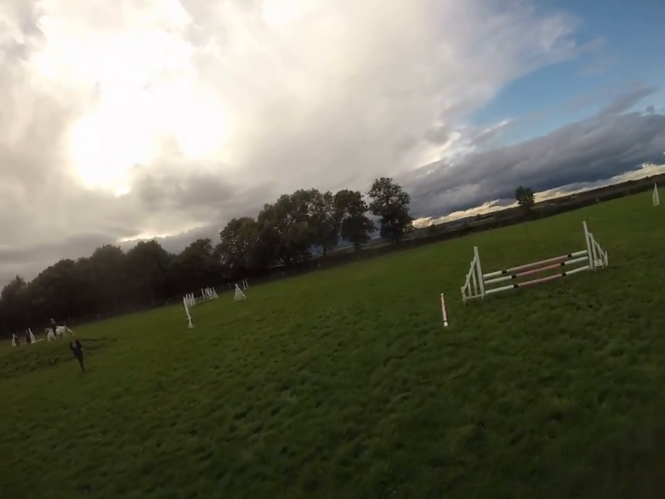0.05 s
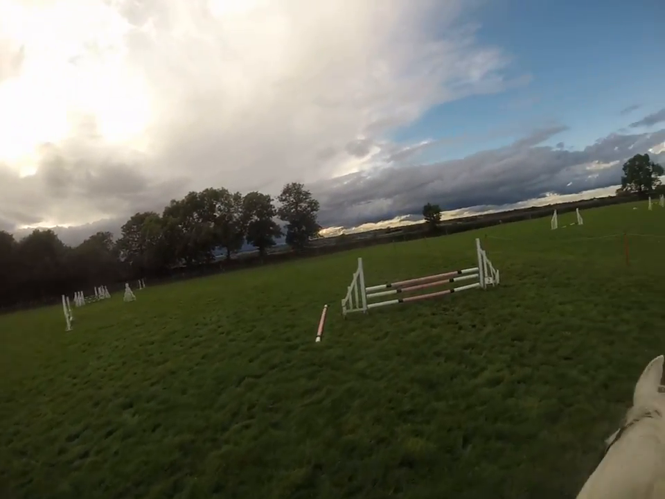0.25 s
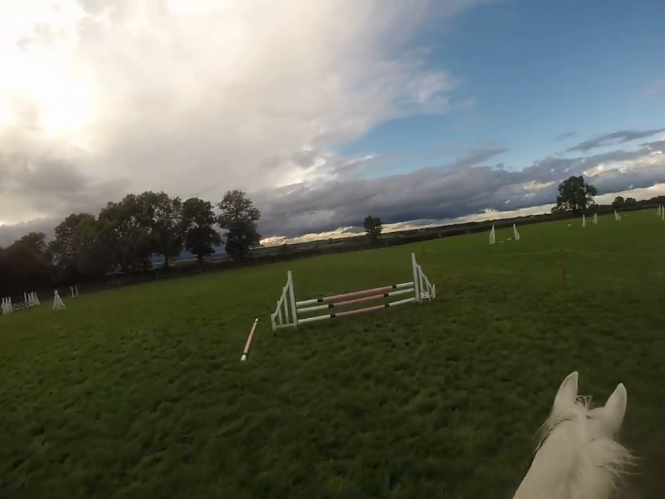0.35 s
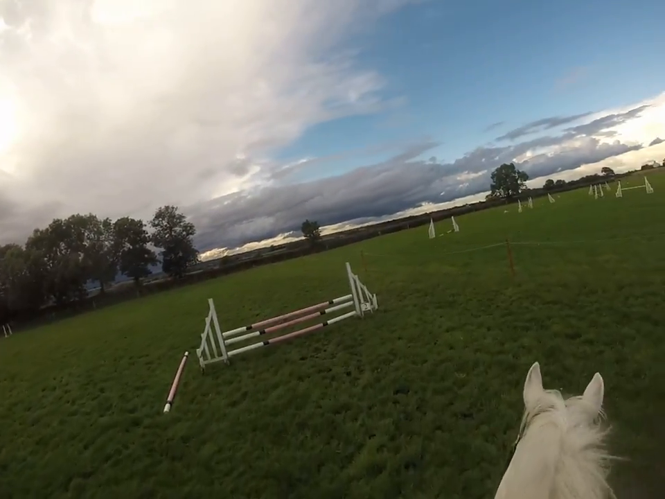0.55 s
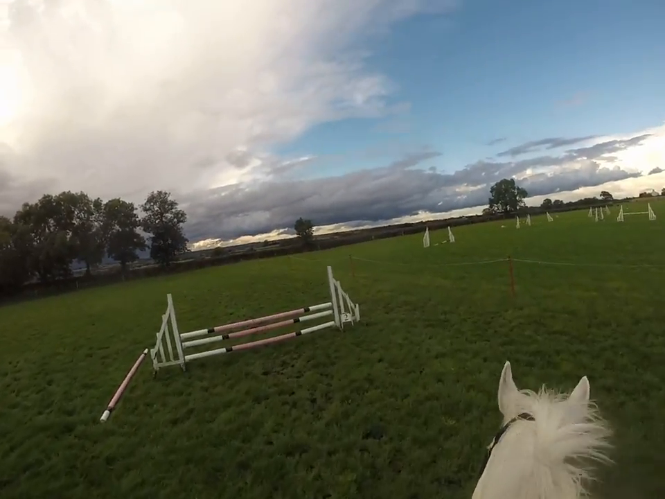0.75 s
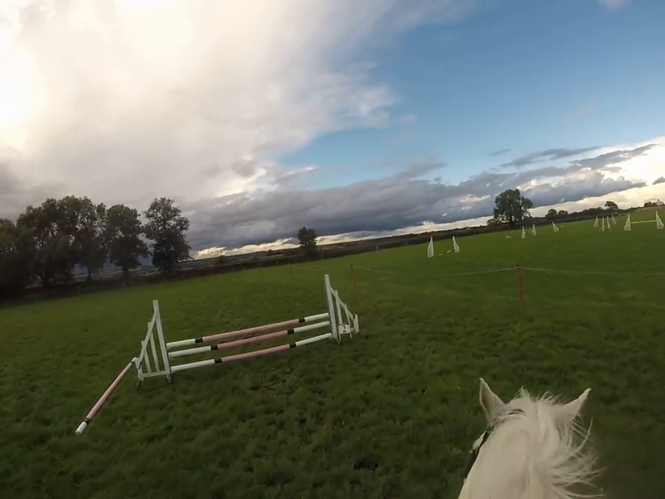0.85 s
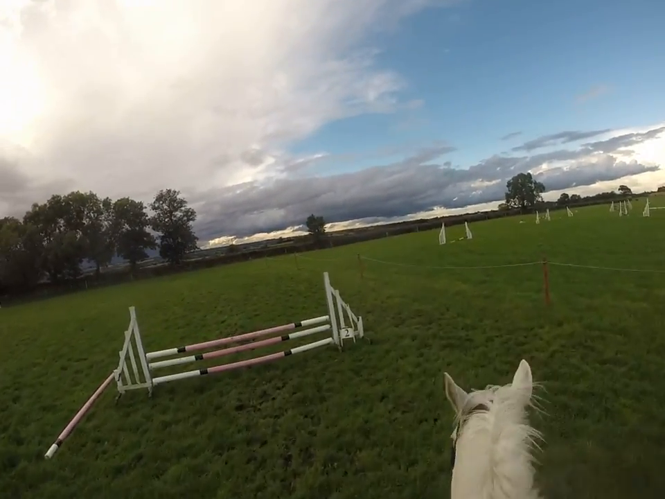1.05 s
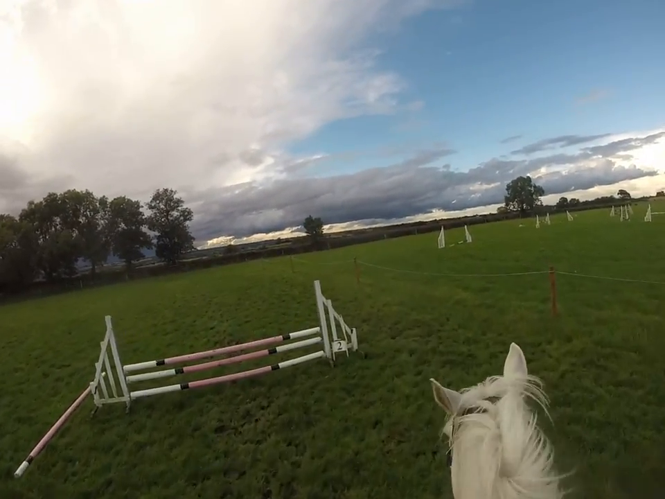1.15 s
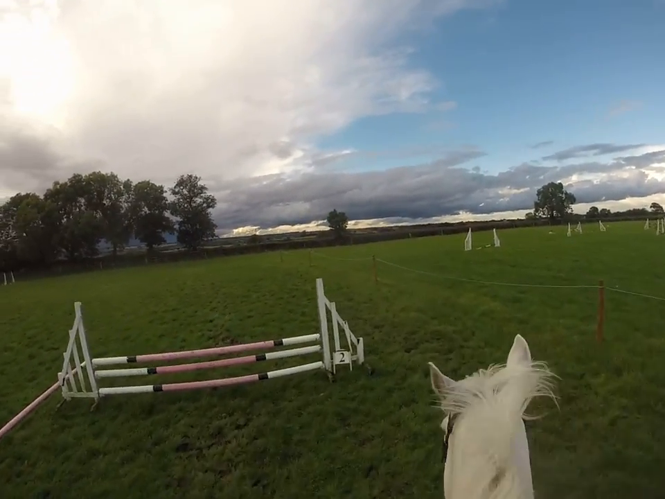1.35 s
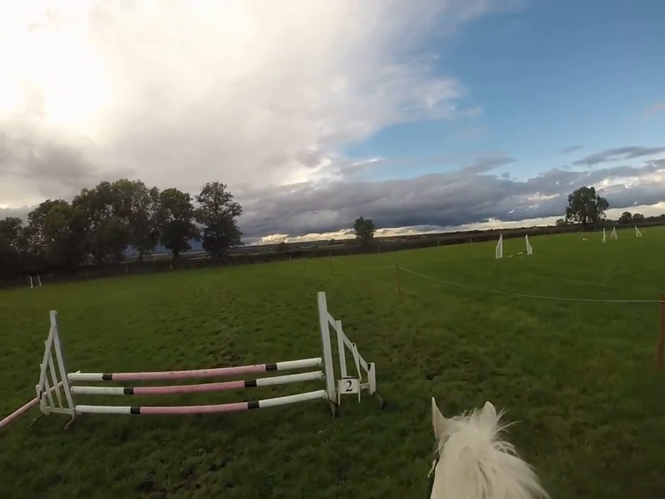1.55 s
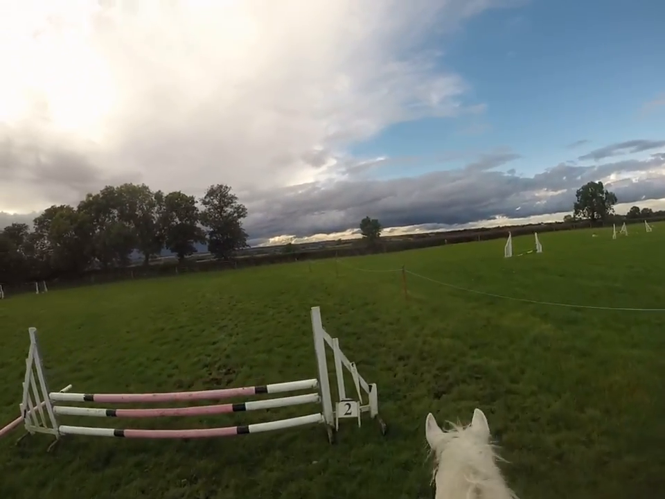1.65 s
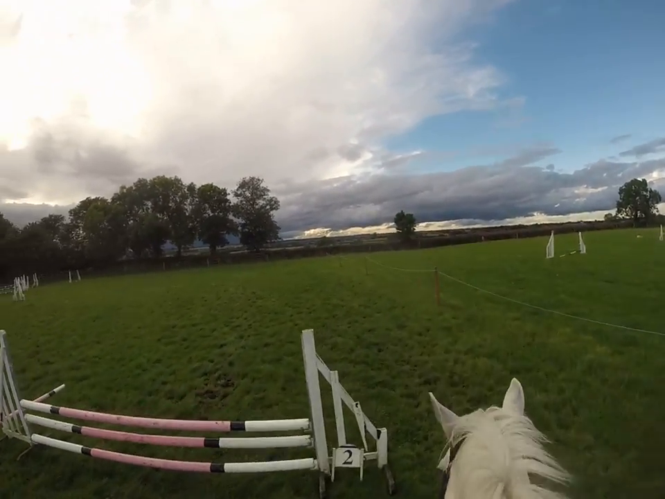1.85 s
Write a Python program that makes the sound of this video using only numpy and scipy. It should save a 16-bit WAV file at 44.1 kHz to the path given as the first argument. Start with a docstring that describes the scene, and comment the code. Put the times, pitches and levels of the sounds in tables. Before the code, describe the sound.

Wind buffets a microphone worn by a rider crossing an open field, rising and falling in quick waves over a faint hiss. The cantering horse's hooves shake the microphone with deep, muffled bumps, the first group the strongest.

```python
"""Wind on a cantering rider's camera

A horse canters over a grass field. The air rush swells with every stride, eddies buffet
the microphone, an edge whistles faintly, and a thin hiss stays steady. Hoofbeats shake
the worn camera with low, soft bumps, and its mount rubs faintly now and then."""
import sys
import numpy as np
from scipy import signal
from scipy.fft import rfft, irfft
from scipy.io import wavfile
from scipy.ndimage import uniform_filter1d

SR = 44100
rng = np.random.default_rng(int(sys.argv[2]) if len(sys.argv) > 2 else 0)


def unload_audio(sound):
    """Save the sound as a 16-bit wav file, at the path given as the first command line argument."""
    columns = np.transpose(np.atleast_2d(sound))
    # keep every value between -1 and 1, then stretch to whole-number steps
    steps = np.round(np.clip(columns, -1, 1) * 32767)
    wavfile.write(sys.argv[1], SR, steps.astype(np.int16))


N = 83790


def undb(db):
    """Decibels to gain."""
    return 10 ** (np.asarray(db) / 20)


def curve(t, points):
    """Straight lines through (time_s, value) points."""
    return np.interp(t, *np.array(points, float).T)


def noise(spectrum):
    """Unit-rms noise shaped by (freq_hz, density_db) points."""
    hz, db = np.array(spectrum, float).T
    bins_hz = np.maximum(np.arange(N // 2 + 1) * SR / N, 1)
    gain = undb(np.interp(np.log(bins_hz), np.log(hz), db))
    bass_rolloff = np.minimum(bins_hz / hz[0], 1) ** 2
    y = irfft(rfft(rng.standard_normal(N)) * gain * bass_rolloff, N)
    return y / np.std(y)


def wander(rate_hz):
    """Smooth random drift, zero mean, unit rms."""
    hold = max(int(SR / rate_hz), 2)
    steps = np.repeat(rng.standard_normal(N // hold + 1), hold)
    y = uniform_filter1d(uniform_filter1d(steps, hold), hold)[:N]
    return (y - y.mean()) / np.std(y)


# Hiss spectrum: freq_hz, density_db
HISS_SPECTRUM = [(100, 9.5), (330, 4.5), (570, 2.5), (760, 0.5), (1200, -2.5), (1550, -1), (2020, -3.5),
                 (2260, 2.5), (2450, -3), (2650, -6), (3000, -9), (4400, -11), (7000, -18.5),
                 (10000, -22.5), (15000, -32.5)]


def hiss():
    """Thin, steady hiss with a slight flutter."""
    level_db, flutter_db = -56, 0.56
    return noise(HISS_SPECTRUM) * undb(level_db + flutter_db * wander(21.37))


# Bright rush over the housing and low roar, swelling per stride: time_s, level_db
RUSH_LEVEL = [(0, -54.5), (0.125, -51.5), (0.19, -50.5), (0.27, -51.5), (0.32, -52.5), (0.39, -57.5),
              (0.58, -66), (0.7, -59.5), (0.76, -53.8), (0.815, -59.5), (0.875, -55), (0.98, -59),
              (1.07, -74), (1.3, -56.5), (1.45, -54), (1.52, -60), (1.67, -74), (1.82, -58), (1.89, -54)]
ROAR_LEVEL = [(0, -55), (0.15, -50), (0.28, -55.5), (0.38, -51), (0.54, -61), (0.63, -54), (0.78, -51),
              (0.91, -46.5), (1.09, -61), (1.2, -51), (1.3, -52), (1.38, -46), (1.52, -51.5), (1.71, -62),
              (1.8, -50.5), (1.9, -51.5)]
# Airflow spectra: freq_hz, density_db
RUSH_SPECTRUM = [(150, -20), (350, -4.5), (580, 3), (720, -6), (980, 1), (1250, -3.5), (1500, 4.5),
                 (1680, 1.5), (1870, 5.5), (2250, 2), (2640, 0.5), (2950, -9), (4200, -16), (6500, -23.5),
                 (15000, -59)]
ROAR_SPECTRUM = [(45, 13.5), (85, -2), (135, 7.5), (215, 5.5), (310, -4.5), (450, -12), (580, -6),
                 (800, -14.5), (2000, -62)]
EDDY_SPECTRUM = [(10, 7.5), (25, -1), (42, 1), (62, -6), (82, -14.5), (112, -8.5), (160, -16), (215, -17.5),
                 (300, -28), (500, -34), (1200, -66)]


def wind(t):
    """Each stride surges forward, swelling the rush, the roar and the eddies at the microphone."""
    flutter_db, eddy_flutter_db = 1, 1.44
    eddy_db, eddy_db_per_roar_db = -41.5, 0.4
    flutter = undb(flutter_db * wander(60.36))
    rush = noise(RUSH_SPECTRUM) * undb(curve(t, RUSH_LEVEL))
    roar_db = curve(t, ROAR_LEVEL)
    roar = noise(ROAR_SPECTRUM) * undb(roar_db)
    swell_db = eddy_db_per_roar_db * (roar_db - roar_db.mean())
    eddies = noise(EDDY_SPECTRUM) * undb(eddy_db + swell_db + eddy_flutter_db * wander(34.94))
    return flutter * (rush + roar) + eddies


# Edge tones: centre_s, level_db, pitch_hz, half_width_s
WHISTLES = [(0.32, -50.5, 2225, 0.0059), (0.96, -61.5, 1900, 0.013), (1.048, -58, 2410, 0.0079),
            (1.392, -54, 1743, 0.0079), (1.405, -57.5, 2273, 0.011), (1.608, -62, 2327, 0.014)]


def edge_whistles(t):
    """Air catches an edge and whistles for an instant at an unsteady pitch."""
    waver_ratio = 0.0106
    out = np.zeros(N)
    for centre_s, level_db, pitch_hz, half_width_s in WHISTLES:
        phase = 2 * np.pi * np.cumsum(pitch_hz * (1 + waver_ratio * wander(300))) / SR
        envelope = np.exp(-((t - centre_s) / half_width_s) ** 2)
        out += undb(level_db) * np.sqrt(2) * np.sin(phase) * envelope
    return out


# Mount scuffs: centre_s, level_db, half_width_s
RUBS = [(0.318, -55, 0.014), (0.973, -55.5, 0.022), (1.616, -55.5, 0.016)]
# Mount tick: start_s, level_db, decay_s
TICKS = [(0.3574, -42.5, 0.0085)]
# Friction spectrum: freq_hz, density_db
RUB_SPECTRUM = [(200, -33), (650, 10.5), (1100, -1), (2300, 8), (3100, -7.5), (5500, -15), (12000, -36.5)]


def mount_rubs(t):
    """The mount scuffs softly, and ticks as the hardest hoofbeat jolts it."""
    tick_rise_s = 0.0011
    envelope = np.zeros(N)
    for centre_s, level_db, half_width_s in RUBS:
        envelope += undb(level_db) * np.exp(-((t - centre_s) / half_width_s) ** 2)
    for start_s, level_db, decay_s in TICKS:
        attack = np.clip((t - start_s) / tick_rise_s, 0, 1)
        envelope += undb(level_db) * attack * np.exp(-np.abs(t - start_s) / decay_s)
    return noise(RUB_SPECTRUM) * envelope


# Hoof impacts: start_s, level_db, shake_hz, rise_s, decay_s, push_ratio, thud_re_shake_db
HOOFBEATS = [(0.199, -33.5, 41.6, 0.03, 0.069, 0.67, -10.5), (0.311, -26.5, 36.8, 0.0028, 0.018, 0.24, -26),
             (0.353, -13.5, 38.54, 0.026, 0.026, 0.38, -23.5), (0.745, -32, 46, 0.012, 0.027, 0.17, -19),
             (0.84, -33.5, 40.6, 0.0068, 0.045, 0, -22), (0.929, -28, 48.9, 0.015, 0.037, 1.1, -14.5),
             (0.971, -23, 42.6, 0.018, 0.038, 1.04, -24), (1.139, -39.5, 43.7, 0.024, 0.025, 0.62, -16.5),
             (1.475, -29.5, 40, 0.071, 0.023, 1.24, -26), (1.55, -28.5, 44.4, 0.031, 0.051, 1.4, -19),
             (1.653, -38.5, 42.7, 0.0084, 0.028, 0, -16)]
# Thud spectrum: freq_hz, density_db
THUD_SPECTRUM = [(40, -10), (80, -4), (112, -0.5), (160, -20), (250, -27), (600, -40.5), (2000, -95)]


def hoofbeats(t):
    """Each hoofbeat thuds, pushes the camera one way and shakes it on its mount for a few cycles."""
    overtone_ratio, wobble_ratio = 0.064, 0.044
    thud = noise(THUD_SPECTRUM)
    out = np.zeros(N)
    for start_s, level_db, shake_hz, rise_s, decay_s, push_ratio, thud_re_shake_db in HOOFBEATS:
        age_s = np.maximum(t - start_s, 0)
        rate_hz = (t > start_s) * shake_hz * (1 + wobble_ratio * wander(39.98))
        phase = 2 * np.pi * np.cumsum(rate_hz) / SR
        shake = np.cos(phase) + overtone_ratio * np.cos(2 * phase)
        attack = np.sin(np.pi / 2 * np.minimum(age_s / rise_s, 1))
        decay = np.exp(-(np.maximum(age_s - rise_s, 0) / decay_s) ** 1.3)
        out += undb(level_db) * attack * decay * (shake - push_ratio + undb(thud_re_shake_db) * thud)
    return out


def scene():
    """Wind and camera bumps at one microphone."""
    t = np.arange(N) / SR
    return (wind(t) + hiss() + hoofbeats(t) + mount_rubs(t) + edge_whistles(t))[None]


def record(dry):
    """The camera thins the deepest bass and cuts the top."""
    bass_cut_hz, top_cut_hz = 4.2, 15100
    highpass = signal.butter(1, bass_cut_hz, "high", fs=SR, output="sos")
    lowpass = signal.ellip(8, .2, 70, top_cut_hz, fs=SR, output="sos")
    return signal.sosfilt(lowpass, signal.sosfilt(highpass, dry))


dry = scene()
out = record(dry)
unload_audio(out)
```